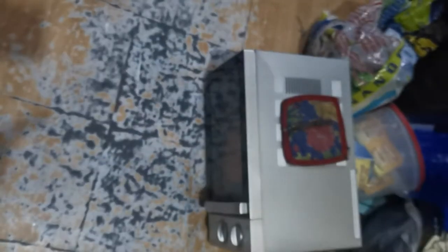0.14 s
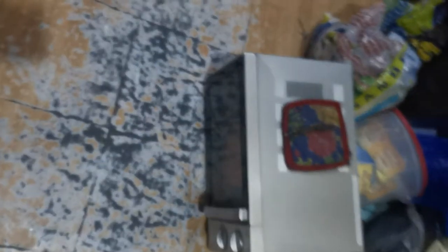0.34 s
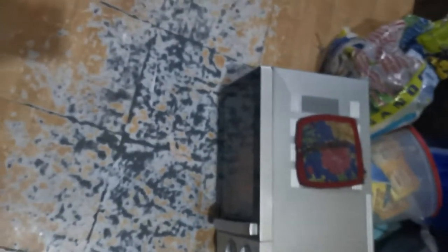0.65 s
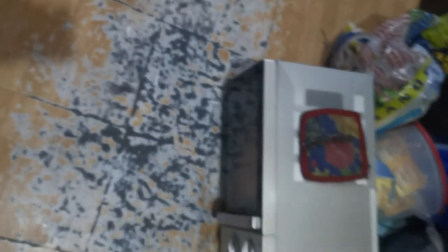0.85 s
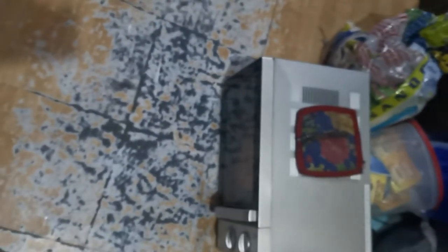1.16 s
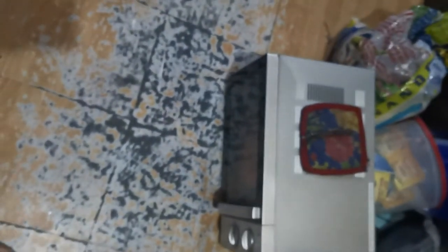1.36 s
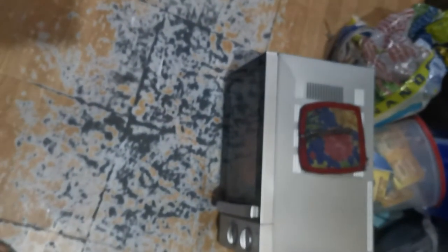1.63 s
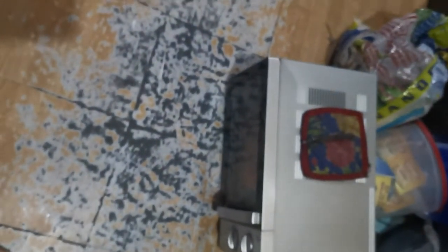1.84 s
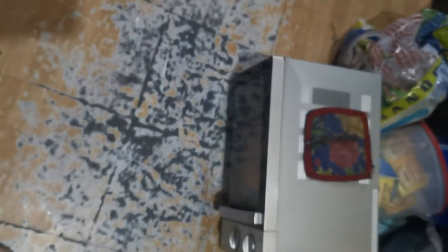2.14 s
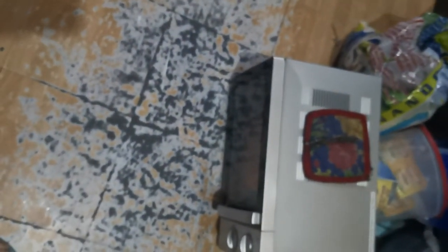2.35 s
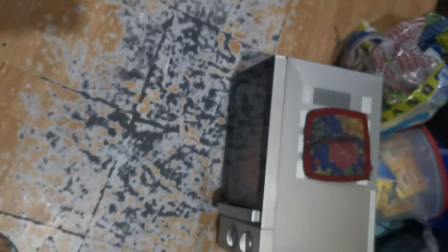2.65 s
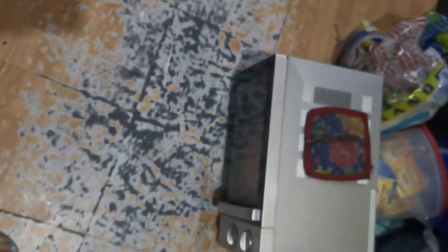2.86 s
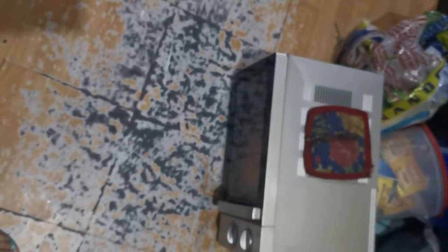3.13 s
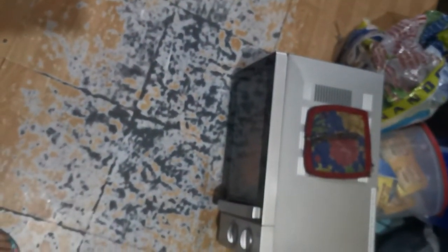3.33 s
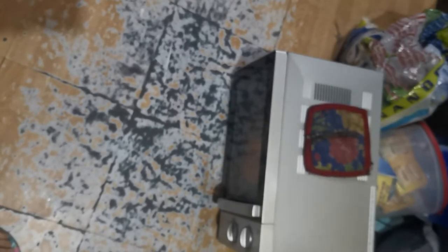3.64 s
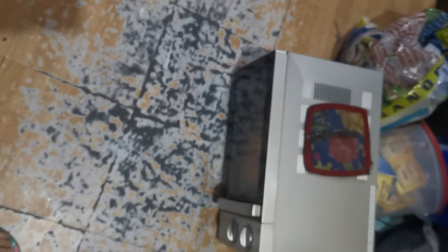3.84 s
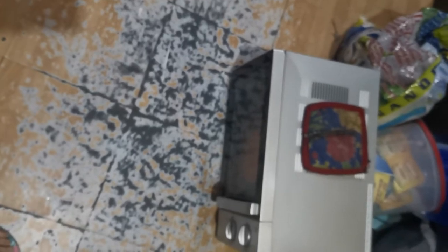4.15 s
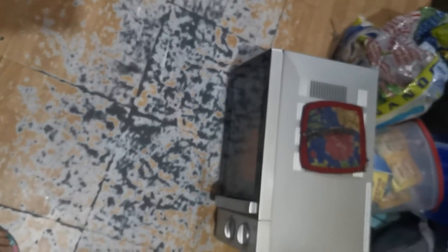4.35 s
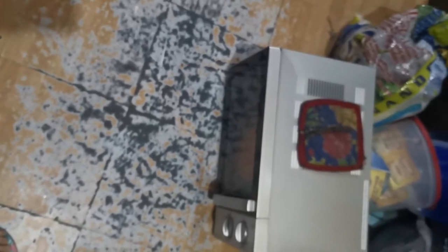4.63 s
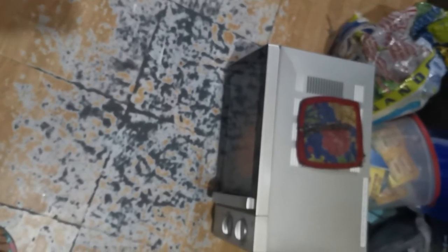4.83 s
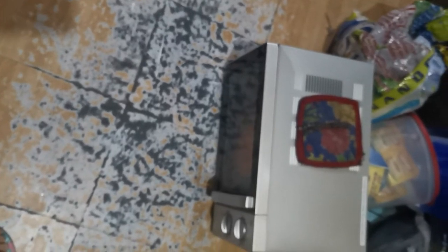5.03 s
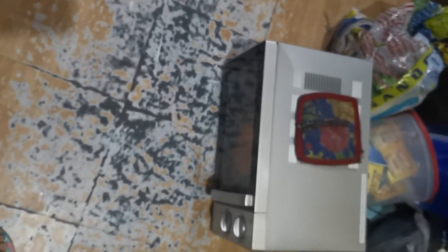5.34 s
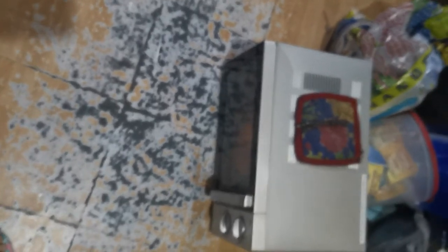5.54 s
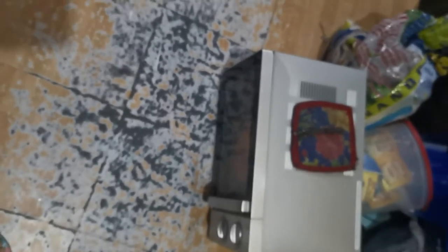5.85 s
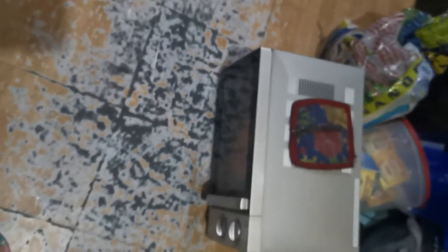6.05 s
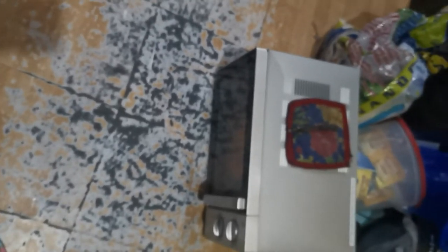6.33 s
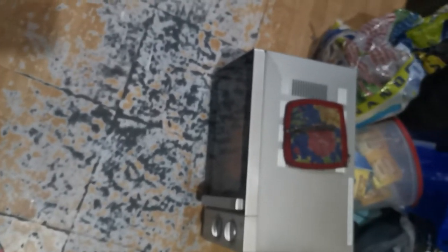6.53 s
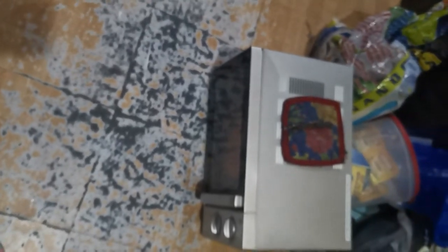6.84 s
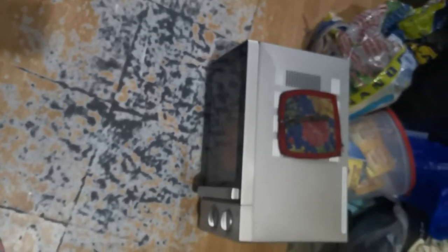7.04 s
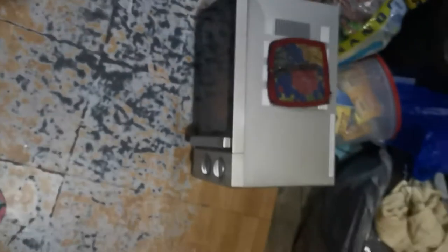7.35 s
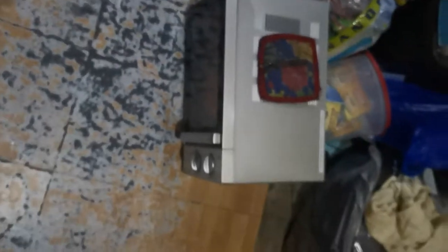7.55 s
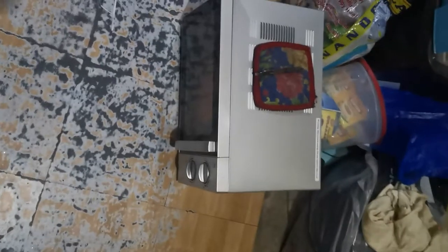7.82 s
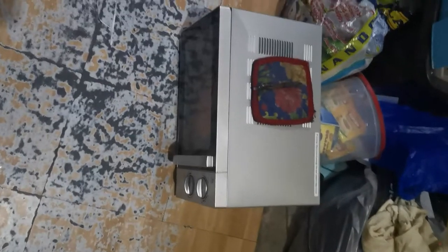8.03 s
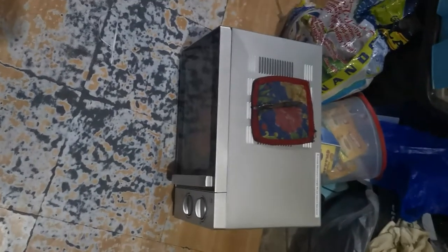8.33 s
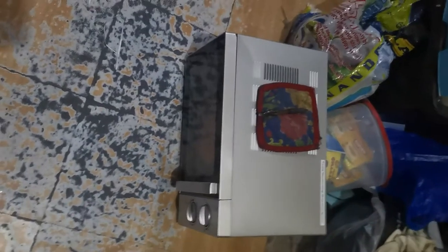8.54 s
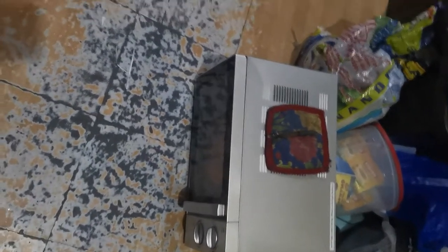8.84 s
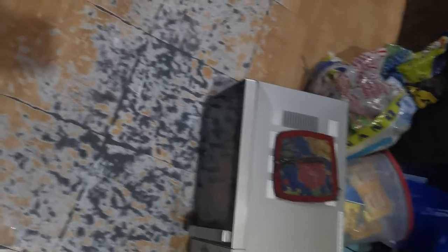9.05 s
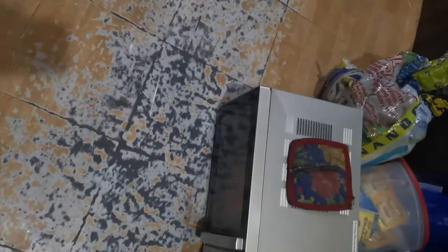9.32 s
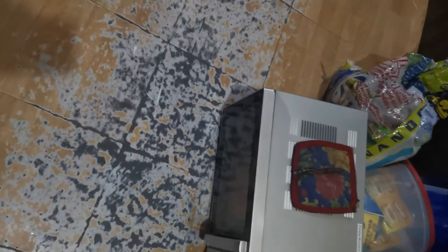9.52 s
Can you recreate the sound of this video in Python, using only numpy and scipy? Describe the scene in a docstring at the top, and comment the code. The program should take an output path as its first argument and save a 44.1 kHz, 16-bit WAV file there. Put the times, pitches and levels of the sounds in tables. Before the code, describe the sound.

Steady low electrical hum of a running microwave, airy fan noise and pulsing tray rumble, light regular ticking, and a few quiet rustles and clicks.

```python
"""Microwave oven in operation

An oven heats on a kitchen floor below a hand-held phone. Its transformer sounds as sines on mains overtones,
its fan as shaft tones and shaped noise, and its turntable as resonant noise swelling with each roller turn.
Single overtones swell and fade as the hand drifts through the room's standing waves. Ticks, snaps and rustles
are short noise puffs with room tails; thin chirps and dull thuds are brief sines; the hand adds low rumble.
"""
import sys
import numpy as np
from scipy import signal
from scipy.fft import rfft, irfft, next_fast_len
from scipy.io import wavfile
from scipy.ndimage import uniform_filter1d, map_coordinates

SR = 44100
rng = np.random.default_rng(int(sys.argv[2]) if len(sys.argv) > 2 else 0)


def generate_wav(signal):
    """Clip the signal to [-1, 1] and save it as 16-bit WAV at the path in sys.argv[1]."""
    frames = np.transpose(np.atleast_2d(signal))
    scaled = np.clip(frames, -1, 1) * 32767
    pcm = np.round(scaled).astype(np.int16)
    wavfile.write(sys.argv[1], SR, pcm)


N = 426888
T = np.arange(N) / SR  # time [s]

# Source levels below apply before the colouring of the microphone ports.
# Balance is left minus right; spectral levels are relative, since the noise is then scaled to rms 1.
MAINS_HZ, FAN_HZ = 59.985, 58.37  # mains frequency, fan shaft speed
ROLLER_TURN_S, ROLLER_START_S, ROLLER_TURNS = 0.5373, 0.275, 18
TICK_ROUND_S, TICK_START_S, TICK_ROUNDS = 1.0812, 1.6965, 8
TICK_SCATTER_DB = 1.1
BAND_LIMIT_HZ = 15620

# Likeness of the two sides of diffuse noise: (frequency [Hz], correlation [-1 to 1])
SIDE_LIKENESS = [(30, 0.62), (70, 0.67), (200, 0.86), (450, 1), (700, -0.013), (1100, -0.23), (2000, 0.055),
                 (16000, -0.15)]
# Thin chirps: (time [s], length [s], frequency [Hz], level before fading [dB rms])
CHIRPS = [(.652, .07, 7120, -69), (.69, .05, 6050, -74)]
# Dull knocks: (time [s], frequency [Hz], level before rise and decay [dB])
THUDS = [(3.948, 200, -33), (6.396, 200, -31)]
# Decay of the room: (frequency [Hz], time to fall 60 dB [s])
ROOM_DECAY = [(500, 0.2), (4000, 0.35), (12000, 0.2)]
# Ringing ticks of a turntable round: (time into round [s], level [dB], balance [dB], body [dB])
TICKS = [(0, -50.5, -3, 2.5), (.452, -56.5, 1, 3)]
# Stray ticks and sharp dry snaps: (time [s], level [dB], balance [dB], body [dB], top [dB])
SNAPS = [(1.195, -38.5, 2, -5, -10), (7.703, -48, -4, -2, -10), (8.467, -48, 4, -3, -6),
         (8.499, -50, 4, -3, 3), (8.511, -49, 4, -6, 9), (8.518, -45, 3, -6, 3), (8.526, -37, 12, 3.5, -1),
         (8.680, -44, 12, 11, -18)]
# Grainy rustles: (time [s], fade time constant [s], level [dB], balance [dB], body [dB])
RUSTLES = [(.21, .035, -56.5, 2, 6.5), (.40, 0.046, -53.5, 0, 1), (1.01, .03, -66, -1.5, 13),
           (1.2, 0.032, -55, 1.5, 4), (1.7, 0.031, -53.5, 2, 5), (8.47, .05, -62, 0, -2),
           (8.504, 0.035, -53.5, -4, 0.5), (8.685, .02, -63, 3, 14)]
# Uneven spots of a roller: (time into turn [s], jolt strength [dB])
ROLLER_BUMPS = [(0, -2.5), (.29, -11.5)]
# Resonances of glass tray and floor plate, before squaring: (frequency [Hz], width [Hz], level [dB])
TRAY_MODES = [(590, 290, 1), (784, 93, 1), (907, 95, -1.5), (1016, 62, -7)]
# Tray rumble before the jolts shape it: (time [s], level [dB])
ROLLING_LEVEL = [(0, -64), (.9, -64), (1.35, -51.5), (2.4, -56.5), (4.1, -57), (4.6, -55), (7.3, -52.5),
                 (7.8, -54.5), (9.68, -54)]
# Tones of the fan shaft: (multiple of shaft speed, level [dB rms])
FAN_ORDERS = [(1, -70.5), (2, -77), (3, -72.5)]
# Spectrum of air through the vents: (frequency [Hz], level [dB per Hz])
AIR_SPECTRUM = [(300, -49), (800, -5.5), (1400, -0.5), (2300, -0.5), (2800, -2), (3200, -5.5), (4800, -9),
                (10000, -17), (16000, -23)]
# Course of the air noise: (time [s], level [dB rms])
AIR_LEVEL = [(0, -55.6), (4, -55.4), (5, -56), (6.8, -56.5), (7.6, -55.5), (9.68, -56)]
# Spectrum of the casing drone: (frequency [Hz], level [dB per Hz])
CASING_SPECTRUM = [(20, -11), (45, -12.5), (100, -9.5), (150, -7), (210, 0.5), (270, -1), (305, -6),
                   (340, -1.5), (400, -7), (440, -5.5), (500, -7), (570, -5), (820, -9.5), (930, -6.5),
                   (1150, -8.5), (1600, -27.5), (3000, -69)]
# Sideways lean of the casing drone: (frequency [Hz], balance [dB])
CASING_BALANCE = [(40, -1), (110, -6), (200, 4.5), (380, 3), (700, 2.5), (1300, 0.5)]
# Steady overtones: (multiple of mains, level [dB rms], balance [dB], left lead [rad], waver [dB])
STEADY_OVERTONES = [(2, -63.5, -1.5, 0.43, 1), (3, -56.5, -0.5, 0.32, 1.8), (7, -70.5, 7, 1.2, -2.7),
                    (8, -57.5, 4.5, 0.57, 0.7), (9, -57, 1, -0.02, 1.4), (11, -74, 5, 2.5, -1),
                    (12, -69, 3, 2, 0), (13, -71.5, 6, 1.6, 1.8), (30, -75.5, -5, -2, .4)]
# Overtones that follow the hand: (multiple of mains, balance [dB], left lead [rad])
MOVING_OVERTONES = [(4, 1.5, -.05), (5, 3, -0.029), (6, -2.3, .1)]
# Their levels at the phone: (time [s], 4th [dB rms], 5th [dB rms], 6th [dB rms])
HAND_LEVELS = [(0, -46, -58, -50), (.3, -45, -62, -51), (.83, -42.5, -61, -50), (1.15, -43.5, -61, -50.5),
               (1.5, -41, -61, -49), (3.5, -40, -64, -50), (4.15, -41.5, -67, -50.5),
               (4.6, -45.5, -70, -49.5), (4.85, -44, -66, -50.5), (5.15, -49, -65, -52),
               (5.4, -45, -62, -50.5), (6.3, -46, -56, -50), (7.3, -45.5, -56.5, -48.5),
               (8.1, -44.5, -53, -48.5), (8.45, -42, -57, -48), (9.44, -39, -56.5, -49),
               (9.68, -38.5, -59, -49)]
# Responses of the two microphone ports: (frequency [Hz], gain [dB])
LEFT_PORT = [(4800, 1), (5800, -4), (6800, 4), (7600, 6.5), (8300, 0.5), (9600, -11.5), (10300, -19),
             (12000, -19), (15500, -19)]
RIGHT_PORT = [(4800, 0), (5500, -5), (6800, -7.5), (7700, -9), (8400, -14), (9600, 3), (10400, 10),
              (11700, 3.5), (13100, -1.5), (15500, -16)]
# Spectrum of the phone's own hiss: (frequency [Hz], level [dB per Hz])
SELF_NOISE = [(3000, -32), (9000, 5), (14000, 6), (15600, -8)]


def amp(db):
    """Decibels are logarithmic: 20 dB is a factor of ten in amplitude."""
    return 10 ** (np.asarray(db) / 20)


def unit(x):
    """Normalisation to unit root mean square."""
    return x / np.sqrt(np.mean(x ** 2) + 1e-20)


def along(points, hz):
    """Interpolation of (frequency, value) points on a logarithmic frequency axis."""
    f, v = np.transpose(points)
    return np.interp(np.log(hz + 1), np.log(f + 1), v)


def curves(rows):
    """Linear interpolation in time, one curve for each column after the first."""
    s, *columns = np.transpose(rows)
    return [np.interp(T, s, column) for column in columns]


def wobble(rate):
    """Slow random fluctuation: a spline through random knots, rate of them a second."""
    knots = rng.standard_normal(int(N * rate / SR) + 4)
    return map_coordinates(knots, [T * rate])


def filtered(x, response):
    """Linear filtering: the spectrum is multiplied by a frequency response."""
    m = next_fast_len(N + SR // 2)
    hz = np.fft.rfftfreq(m, 1 / SR)
    return irfft(rfft(x, m) * response(hz), m)[..., :N]


def sides(balance_db):
    """Level difference between the sides: half the balance is raised left and lowered right."""
    return amp([[balance_db / 2], [-balance_db / 2]])


def rush(gain, patchy_db):
    """Diffuse noise of rms 1: partly correlated sides, with random gain over time and frequency."""
    z = signal.stft(rng.standard_normal((2, N)), nperseg=512)[2]
    field = uniform_filter1d(rng.standard_normal(z.shape[1:]), size=6, axis=0)
    field = uniform_filter1d(field, size=14, axis=1)
    pair = signal.istft(z * amp(patchy_db * unit(field)), nperseg=512)[1][:, :N]

    def mid_side_gain(hz):
        # cos^2 - sin^2 of this angle is the wanted correlation
        angle = np.arccos(np.clip(along(SIDE_LIKENESS, hz), -1, 1)) / 2
        return gain(hz) * [np.cos(angle), np.sin(angle)]

    mid, side = filtered(pair, mid_side_gain)
    return unit(np.array([mid + side, mid - side]))


def tone(phase, db, balance_db, lead):
    """Level and phase difference: one sine reaches the two ports at different strength and phase."""
    shift = np.array([[lead / 2], [-lead / 2]])
    return np.sqrt(2) * amp(db) * sides(balance_db) * np.sin(phase + shift)


def handling():
    """Contact noise: low unsteady rumble of the hand, independent at each port."""
    spectrum = [(8, -15), (25, -3), (50, -3), (90, -26.0)]  # (frequency [Hz], level [dB])
    noise = filtered(rng.standard_normal((2, N)), lambda hz: amp(along(spectrum, hz)))
    return amp(-71.5 + 3.8 * wobble(1.55)) * unit(noise)


def thuds(t60=0.03, rise=0.003):
    """Damped oscillation: each low knock rises fast and decays exponentially; times in s."""
    out = np.zeros(N)
    for s, hz, db in THUDS:
        age = np.clip(T - s, 0, None)
        envelope = amp(db - 60 * age / t60) * (1 - np.exp(-age / rise))
        out += envelope * np.sin(2 * np.pi * hz * age)
    return out


def chirps():
    """Phase modulation: slightly unsteady whistles, stronger on the left."""
    out = np.zeros((2, N))
    for s, length, hz, db in CHIRPS:
        onset = np.clip((T - s) / 0.004, 0, 1)
        fade = np.clip((s + length - T) / length, 0, 1) ** 0.5
        phase = 2 * np.pi * hz * T + 0.7 * wobble(60)
        out += onset * fade * tone(phase, db, 9, 0)
    return out


def add_puff(out, s, envelope, db, balance_db, body_db, tail_db, top_db):
    """Direct and reverberant sound: a shaped noise burst meets a fresh decaying room tail."""
    hz, t, z = signal.stft(rng.standard_normal((2, SR // 3)), SR, nperseg=256)
    decay = amp(-60 * t / along(ROOM_DECAY, hz)[:, None])
    room = signal.istft(z * decay, SR, nperseg=256)[1]
    room *= amp(tail_db) / np.linalg.norm(room[0])
    room[:, 0] += 1  # the direct sound
    burst = envelope * np.sign(rng.standard_normal(len(envelope)))
    puff = signal.fftconvolve(burst[None], room, axes=1)
    m = next_fast_len(puff.shape[1])
    # body and top are set relative to the treble at 7-11 kHz
    shape = [(400, body_db - 40), (1000, body_db - 9), (2800, body_db), (4500, body_db),
             (7000, 0), (11000, 0), (14000, top_db), (15500, top_db - 9)]
    colour = amp(along(shape, np.fft.rfftfreq(m, 1 / SR)))
    puff = irfft(rfft(puff, m) * colour, m)
    out[:, round(s * SR):][:, :m] += amp(db) * sides(balance_db) * puff


def crackles():
    """Impulsive sources: periodic ringing ticks, stray ticks and sharp dry snaps, and grainy rustles."""
    out, t = np.zeros((2, N + SR)), T[:SR // 5]
    for turn in range(TICK_ROUNDS):
        for s, db, balance, body in TICKS:
            start = TICK_START_S + turn * TICK_ROUND_S + s
            level = db + TICK_SCATTER_DB * rng.standard_normal()
            add_puff(out, start, amp(-60 * t / 0.014), level, balance, body, tail_db=10.0, top_db=-14)
    for s, db, balance, body, top in SNAPS:
        add_puff(out, s, amp(-60 * t / 0.004), db, balance, body, tail_db=-4, top_db=top)
    for s, fade, db, balance, body in RUSTLES:
        # each grain holds one random strength for 90 samples
        grain = amp(2.5 * np.repeat(rng.standard_normal(len(t) // 90), 90))
        envelope = unit(grain) * (1 - np.exp(-t / 0.003)) * np.exp(-t / fade)
        add_puff(out, s, envelope, db, balance, body, tail_db=2.0, top_db=-5)
    return out[:, :N]


def tray_response(f):
    """Modal superposition: damped resonances add, and the squared magnitude sharpens them."""
    modes = sum(amp(db) * f * w / (c * c - f * f + 1j * f * w) for c, w, db in TRAY_MODES)
    return np.abs(modes) ** 2


def rollers(width=0.021, steady=0.39):
    """Rolling excitation: uneven spots jolt the rumbling tray; width [s], steady share as gain."""
    jolts = np.zeros(N + SR)
    for turn in range(ROLLER_TURNS):
        for s, db in ROLLER_BUMPS:
            start = round((ROLLER_START_S + turn * ROLLER_TURN_S + s) * SR)
            jolts[start] = amp(db + 1.2 * rng.standard_normal())
    swell_time = np.arange(-SR // 8, SR // 8) / SR
    swell = np.exp(-0.5 * (swell_time / width) ** 2)
    shake = steady + signal.fftconvolve(jolts, swell, "same")[:N]
    rumble = rush(tray_response, patchy_db=0)
    # dividing by the 40 ms rms evens the noise, so that it follows the shake
    short_rms = np.sqrt(np.abs(uniform_filter1d(np.mean(rumble ** 2, axis=0), size=SR // 25)))
    return amp(curves(ROLLING_LEVEL)[0]) * sides(4.6) * shake * rumble / short_rms


def fan_shaft():
    """Rotating unbalance: tones on multiples of the shaft speed beat against the hum."""
    turn = 2 * np.pi * FAN_HZ * T + 0.62 * wobble(1.494)
    return sum(tone(k * turn, db + 2.3 * wobble(2.95), 0, 0.2) for k, db in FAN_ORDERS)


def fan_air():
    """Flow noise: air through the vents gives a broad hiss with small level fluctuations."""
    level = amp(curves(AIR_LEVEL)[0] + 0.45 * wobble(7))
    return level * rush(lambda f: amp(along(AIR_SPECTRUM, f)), patchy_db=0.65)


def casing_drone():
    """Structural radiation: the casing drones as low noise whose balance varies with frequency."""
    level = amp(-52.5 + 0.92 * wobble(3.57))
    drone = level * rush(lambda f: amp(along(CASING_SPECTRUM, f)), patchy_db=1.06)

    def lean(f):
        half = along(CASING_BALANCE, f) / 2
        return amp([half, -half])

    return filtered(drone, lean)


def transformer(spread=0.9, drift=0.75):
    """Harmonic series on the mains: overtone phases are set by a k-squared rule and wander slowly [rad]."""
    def phase(k):
        return 2 * np.pi * MAINS_HZ * k * T + spread * k * k + drift * wobble(0.657)

    hum = np.zeros((2, N))
    for k, db, balance, lead, waver_db in STEADY_OVERTONES:
        hum += tone(phase(k), db + waver_db * wobble(1.58), balance, lead)
    for (k, balance, lead), db in zip(MOVING_OVERTONES, curves(HAND_LEVELS)):
        hum += tone(phase(k), db, balance, lead)
    return hum


def scene():
    """Superposition: the pressures of all sources add."""
    background = handling() + thuds() + chirps() + crackles()
    oven = rollers() + fan_shaft() + fan_air() + casing_drone() + transformer()
    return background + oven


def record(dry):
    """Transduction: each port colours the treble, electronics add hiss, and a band limit cuts the top."""
    ports = filtered(dry, lambda hz: amp([along(LEFT_PORT, hz), along(RIGHT_PORT, hz)]))
    hiss = amp(-87.5) * rush(lambda hz: amp(along(SELF_NOISE, hz)), patchy_db=1.5)
    return filtered(ports + hiss, lambda hz: hz < BAND_LIMIT_HZ)


dry = scene()
out = record(dry)
generate_wav(out)
```